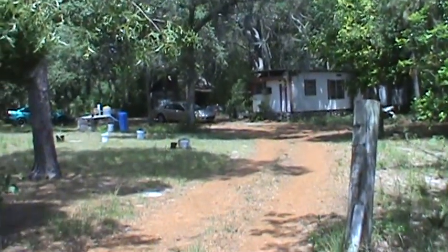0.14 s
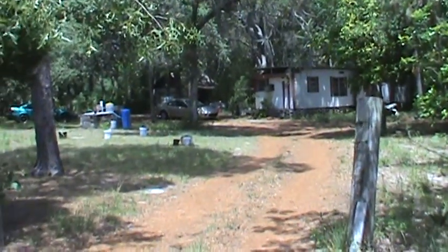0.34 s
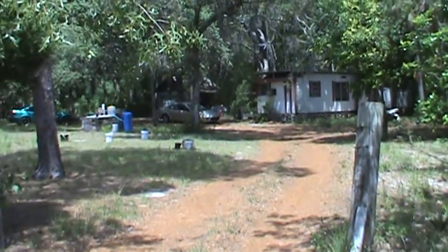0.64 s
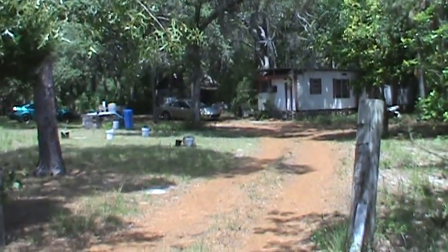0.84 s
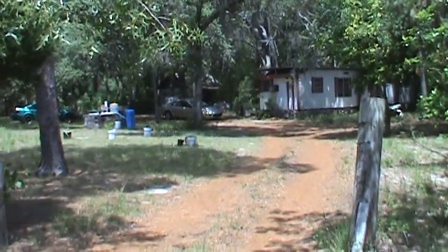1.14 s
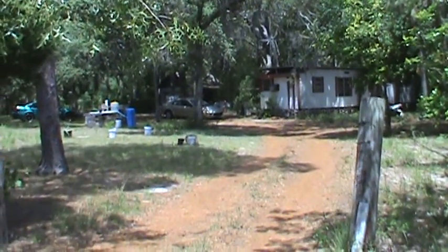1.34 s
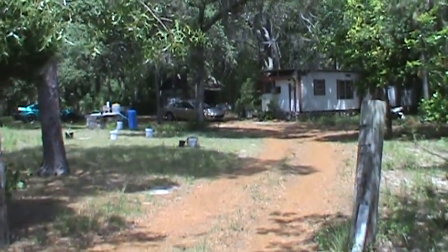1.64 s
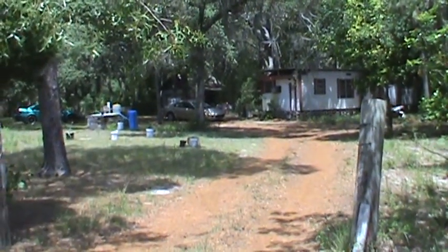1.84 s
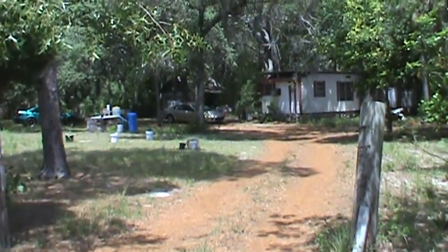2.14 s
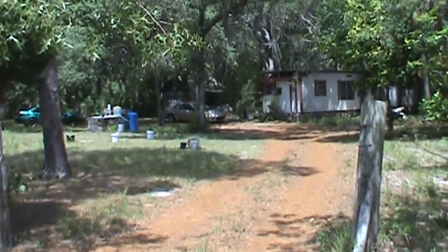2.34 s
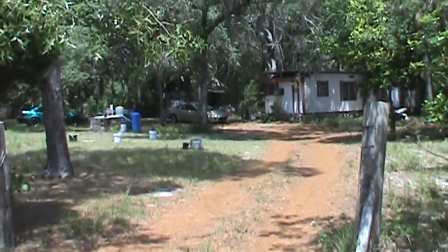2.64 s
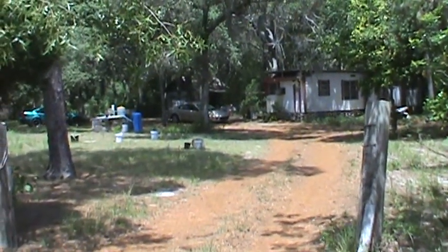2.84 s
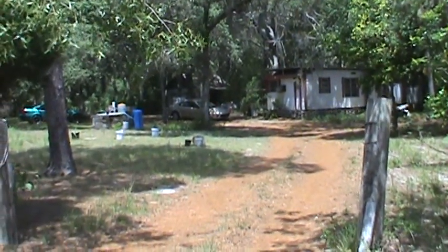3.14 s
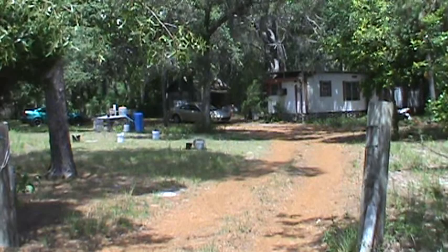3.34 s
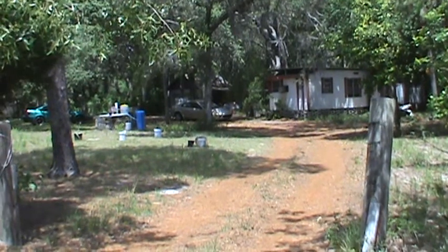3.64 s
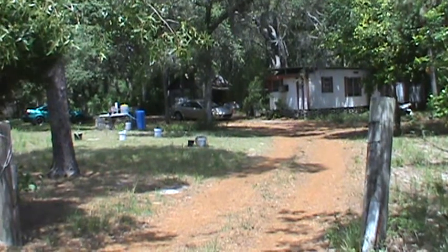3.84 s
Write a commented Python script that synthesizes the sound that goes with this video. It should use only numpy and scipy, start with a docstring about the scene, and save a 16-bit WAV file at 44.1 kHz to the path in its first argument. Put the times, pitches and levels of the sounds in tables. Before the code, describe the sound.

A motorcycle engine starts abruptly at about 2.3 seconds and revs hard, peaking near 2.5, 3.15 and 3.8, sinking into a ragged low burble between; bassy exhaust booms, barks and hisses, with a short scatter off trees and its low end rightward. Beforehand: quiet airy wash, steady cricket trill, faint distant motor climbing in pitch, a dry tick at 0.4 and soft microphone bump at 0.9.

```python
"""A motorcycle engine fires up beside a quiet country driveway, and its speed flares three times.
Each firing is a click that thumps through the exhaust pipe's resonances. With the throttle open,
bursts of noise add a rasp and a hiss, and the trees scatter the sound as a short noise tail.
Around it are a distant motor (wavering harmonics and chugging noise), a trilling cricket (a pulsed
tone), a wash of filtered noise, one dry tick and a soft bump on the microphone."""
import sys
import numpy as np
from scipy import signal
from scipy.fft import rfft, irfft
from scipy.io import wavfile
from scipy.ndimage import uniform_filter1d

SR = 44100
rng = np.random.default_rng(int(sys.argv[2]) if len(sys.argv) > 2 else 0)


def inscribe(sig):
    """Save sig as 16-bit PCM at rate SR to the path in sys.argv[1].

    A 1-D sig is mono; a 2-D sig holds one channel per row.
    Samples are clipped to [-1, 1] before scaling.
    """
    pcm = np.round(np.clip(np.atleast_2d(sig).T, -1, 1) * 32767)
    wavfile.write(sys.argv[1], SR, pcm.astype(np.int16))


N = 176400
T = np.arange(N) / SR  # time of each sample, in seconds
FREQS = np.maximum(np.arange(N + 1) * SR / (2 * N), 1)  # pitches that colour() filters, in Hz
START_S = 2.31  # ignition

# engine speed over time: time_s [s], speed_hz [firings per second]
ENGINE_SPEED = [(2.32, 39.4), (2.37, 51), (2.40, 66), (2.46, 108), (2.54, 144), (2.62, 115), (2.68, 105),
                (2.74, 104.7), (2.80, 83), (2.89, 67), (2.96, 56.7), (3.0, 54.2), (3.05, 51), (3.11, 92),
                (3.16, 105.3), (3.23, 94), (3.29, 71.7), (3.36, 62.5), (3.44, 59), (3.5, 57.3),
                (3.62, 60.8), (3.73, 60.6), (3.79, 103.5), (3.83, 120.7), (3.89, 112), (3.95, 101.4)]
# noise levels as the throttle moves, before each is trimmed: time_s [s], rasp_db [dB], hiss_db [dB]
THROTTLE_LEVELS = [(2.3, -53, -53), (2.38, -47.5, -40), (2.438, -22.5, -34), (2.548, -18.5, -26),
                   (2.61, -27.5, -37.5), (2.778, -31.5, -50.5), (2.912, -34.5, -49.5), (2.988, -37, -51),
                   (3.08, -36, -42), (3.15, -18.5, -32), (3.198, -23.5, -29.5), (3.242, -32.5, -33.5),
                   (3.304, -30.5, -48), (3.424, -35.5, -49), (3.722, -44.5, -44.5), (3.792, -22, -31),
                   (3.836, -19, -26), (3.904, -27.5, -28.5), (3.97, -30.5, -52), (4.0, -30, -52)]


def from_db(db):
    """Turn decibels into a gain."""
    return 10 ** (np.asarray(db) / 20)


def rms_one(x):
    """Scale a sound so that its average strength (rms) is 1."""
    return x / np.sqrt(np.mean(x ** 2) + 1e-20)


def in_time(rows):
    """Draw straight lines between the rows of a table: one curve per column, sample by sample."""
    time_s, *columns = np.transpose(rows)
    return [np.interp(T, time_s, column) for column in columns]


def colour(x, points, share=1):
    """Make some pitches louder and others softer, by a table of pitch_hz and level_db."""
    hz, db = np.transpose(points)
    gain_db = share * np.interp(np.log(FREQS), np.log(hz), db)
    return irfft(rfft(x, 2 * N) * from_db(gain_db))[..., :N]


def drift(rate):
    """Slow random motion with spread 1; a higher rate (Hz) wanders faster."""
    hz = np.arange(N // 2 + 1) * SR / N
    spectrum = rfft(rng.standard_normal(N))
    return rms_one(irfft(spectrum / (1 + (hz / rate) ** 2), N))


def evened(x, window_s):
    """Hold the running strength close to 1, so that a level curve can shape it afterwards."""
    size = max(int(window_s * SR), 3)
    power = uniform_filter1d(uniform_filter1d(x ** 2, size), size)
    floor = np.mean(x ** 2) / 1000  # keeps near-silence from being blown up
    return x / np.sqrt(np.abs(power) + floor)


def resonance(x, hz, width_hz):
    """Ring at one pitch like a struck pipe, with gain 1 at the peak; a narrow width rings longer."""
    r = np.exp(-np.pi * width_hz / SR)
    top = np.array([1, 0, -1]) * (1 - r * r) / 2
    bottom = [1, -2 * r * np.cos(2 * np.pi * hz / SR), r * r]
    return signal.lfilter(top, bottom, x + 1e-18)


def band(x, low_hz, high_hz):
    """Keep only the pitches between two limits, with steep edges."""
    return signal.sosfilt(signal.butter(5, [low_hz, high_hz], "band", fs=SR, output="sos"), x)


def far_motor():
    """A distant motor: wavering harmonics that slowly climb, over chugging noise that grows with speed."""
    # pitch and harmonics before they waver: time_s [s], pitch_hz [Hz],
    # second_db [dB], third_db [dB], fifth_db [dB] (multiples 2, 3 and 5 of the pitch)
    far_harmonics = [(0, 55.1, -49, -57, -81), (.22, 56.15, -43, -56, -88), (.69, 58.54, -42, -55, -59),
                     (.77, 61.76, -55, -51.5, -52), (1.1, 64.57, -47.5, -51, -50),
                     (1.5, 66.88, -48.5, -48.5, -54), (2.3, 70.56, -48, -48.5, -52)]
    # resonances of the motor's body: pitch_hz [Hz], width_hz [Hz], level_db [dB, relative]
    murmur_tones = [(309, 38, -4.5), (448, 70, 13), (610, 34, -0.5), (1510, 230, -22)]
    waver_db = 2
    murmur_db, murmur_db_per_hz = -51, 0.5  # level at top speed; loss per Hz below it
    hz, *levels = in_time(far_harmonics)
    phase = 2 * np.pi * np.cumsum(hz * (1 + 0.014 * drift(rate=15))) / SR
    # noise in pulses, every other one stronger
    chugs = np.exp(np.cos(phase) + .5 * np.cos(phase / 2)) * rng.standard_normal(N)
    murmur = rms_one(sum(from_db(db) * resonance(chugs, centre, width) for centre, width, db in murmur_tones))
    sound = murmur * from_db(murmur_db + murmur_db_per_hz * (hz - hz.max()))
    for multiple, db in zip((2, 3, 5), levels):
        gain = np.sqrt(2) * from_db(db + waver_db * drift(rate=25))
        sound = sound + gain * np.sin(multiple * phase)
    return sound


def cricket():
    """A steady trill: one tone that swells and slides down with each wing stroke."""
    pitch_hz, sweep_hz, strokes_per_s = 3391, 22, 57.5  # the pitch moves 22 Hz to either side
    level_db, flutter_db = -61.5, 0.9
    wing = 2 * np.pi * strokes_per_s * T
    strokes = 1 + np.cos(wing)
    phase = 2 * np.pi * np.cumsum(pitch_hz - sweep_hz * np.sin(wing)) / SR
    return from_db(level_db + flutter_db * drift(rate=37)) * strokes * np.sin(phase)


def air():
    """Soft wash of far traffic and leaves: coloured noise, slightly different in each channel."""
    # tone of the outdoor background: pitch_hz [Hz], level_db [dB per Hz, relative]
    air_colour = [(20, -66), (45, 3.5), (100, 0), (160, -4), (330, -0.5), (620, -5.5), (1170, -14),
                  (1700, -17), (2800, -23), (4200, -26), (7000, -31.5), (15500, -32.5)]
    # loudness of its shared part: time_s [s], level_db [dB]
    air_level = [(0, -44), (1.2, -42)]
    width_db = -9  # part that differs between left and right, against the shared part
    mid, side = colour(rng.standard_normal((2, N)), air_colour)
    opposed = rms_one(side) * np.array([[1], [-1]])
    return from_db(in_time(air_level)[0]) * (rms_one(mid) + from_db(width_db) * opposed)


def tick():
    """One faint dry tick in the yard: a very short tone with a broad edge of noise."""
    start_s, pitch_hz, length_s, level_db = .404, 3100, .003, -51.5  # start_s is its middle
    crack_db = -7  # noise edge, against the tone
    t = T - start_s
    noise = band(rng.standard_normal(N), pitch_hz / 2, pitch_hz * 2)
    edge = from_db(crack_db) * rms_one(noise)
    return from_db(level_db) * np.exp(-(t / length_s) ** 2) * (np.sin(2 * np.pi * pitch_hz * t) + edge)


def bump():
    """A dull knock on the microphone: a low tone that swells and dies within a moment."""
    middle_s, pitch_hz, width_s, level_db = .895, 77, 0.0094, -26.5
    t = T - middle_s
    return from_db(level_db) * np.exp(-(t / width_s) ** 2) * np.cos(2 * np.pi * pitch_hz * t)


def swing(sign):
    """0-1: how hard the engine speed climbs (sign above 0) or falls (sign below 0)."""
    full_hz_per_s = 160  # change of speed that counts as full when sign is 1
    speed, = in_time(ENGINE_SPEED)
    change = np.gradient(speed) * SR
    return uniform_filter1d(np.clip(sign * change / full_hz_per_s, 0, 1), size=1500)


def overrun():
    """0 while the engine pulls, up to 1 while it coasts down with the throttle shut."""
    return swing(-1.3)


def firings():
    """One click per firing: fairly even under load, ragged as the engine burbles on the overrun."""
    # strength of successive firings, taken in turn: level_db [dB]
    cylinder_db = [1.5, -1.5, .8, -.8]
    first_firing = .6  # share of the first cycle already turned
    cylinder_late = .015  # alternate firings come early and late: share of a cycle
    timing_scatter, overrun_timing = .012, .03  # share of a cycle: under load; added on the overrun
    scatter_db, overrun_scatter_db = 1.2, 2.4  # spread of strength: under load; added on the overrun
    speed, = in_time(ENGINE_SPEED)
    cycles = first_firing + np.cumsum(speed * (T > START_S)) / SR
    k = np.arange(1, int(cycles[-1]))  # number of each firing
    chance = rng.standard_normal((400, 2))[k]
    ragged = overrun()[np.searchsorted(cycles, k)]
    shift = cylinder_late * (-1) ** k + (timing_scatter + overrun_timing * ragged) * chance[:, 0]
    at = np.minimum(np.searchsorted(cycles, k + shift), N - 1)
    strength_db = np.array(cylinder_db)[k % len(cylinder_db)]
    strength_db = strength_db + (scatter_db + overrun_scatter_db * ragged) * chance[:, 1]
    clicks = np.zeros(N)
    clicks[at] = from_db(strength_db)
    return clicks


def puffs(clicks, decay_s, steady):
    """Turbulent gas: a fading burst of noise at each firing over a steady flow."""
    gate = signal.lfilter([1], [1, -np.exp(-1 / (decay_s * SR))], clicks + 1e-18)
    return rms_one((gate + steady) * rng.standard_normal(N))


def hiss(clicks):
    """The exhaust jet spits and hisses: puffs of noise, with a bright spray at full throttle."""
    # tone of the jet: pitch_hz [Hz], level_db [dB per Hz, relative]
    hiss_colour = [(1500, 4.5), (3500, -2.5), (4500, -2.5), (6500, -1.5), (8000, -3.5), (10500, -3),
                   (12000, -8), (13500, -24), (15800, -22)]
    trim_db, flutter_db = 0.57, 1.0
    # top of the hiss: lower edge; level against the hiss at its loudest; dB gained per dB of hiss
    spray_hz, spray_db, spray_growth = 12100, -22.5, 1.3
    db = in_time(THROTTLE_LEVELS)[1] + trim_db
    jet = puffs(clicks, decay_s=.004, steady=.6) * from_db(flutter_db * drift(rate=4300))
    jet = evened(colour(jet, hiss_colour), window_s=0.26)
    top = signal.sosfilt(signal.butter(10, spray_hz, "high", fs=SR, output="sos"), jet)
    spray = evened(top, window_s=.035)
    return jet * from_db(db) + spray * from_db(db.max() + spray_db + spray_growth * (db - db.max()))


def rasp(clicks):
    """Each firing's sharp edge and puff of gas bark through higher pipe resonances; duller when quiet."""
    # higher resonances of the pipe: pitch_hz [Hz], width_hz [Hz], level_db [dB]
    pipe_ring = [(660.3, 14, 0.5), (700, 15, -9), (764, 26, -12), (1060, 22, -1.5), (1405, 11, -1),
                 (1673, 83, 6.5), (1760, 9.2, 1)]
    # tone of the bark: pitch_hz [Hz], level_db [dB per Hz, relative]
    rasp_colour = [(200, -36), (380, 7), (500, 5.5), (570, -0.5), (660, 1), (820, 5), (1060, 0.5),
                   (1300, -3), (1680, -9), (2500, -8), (3400, -13.5), (5000, -26), (9000, -51)]
    trim_db, crack_db = -1.5, -2.5  # overall trim; sharp edge against the gas puff
    # dull part that stays when the throttle shuts; growth is dB gained per dB that the rasp falls
    burble_hz, burble_width_hz, burble_db, burble_growth = 585, 116, -7, 1
    bite_hz, bite_lag_s = 1410, 0.014  # above this pitch the rasp swells later, by this much
    level_db = in_time(THROTTLE_LEVELS)[0] + trim_db
    drive = from_db(crack_db) * rms_one(clicks) + puffs(clicks, decay_s=.004, steady=.35)
    drive = drive + sum(from_db(db) * resonance(drive, hz, width) for hz, width, db in pipe_ring)
    bark = colour(drive, rasp_colour)
    burble_gain = from_db(burble_db + burble_growth * (level_db.max() - level_db))
    burble = resonance(bark, burble_hz, burble_width_hz) * burble_gain
    voice = evened(bark + burble, window_s=0.028)
    body = signal.sosfiltfilt(signal.butter(2, bite_hz, fs=SR, output="sos"), voice)
    bite = voice - body
    early = from_db(np.interp(T + bite_lag_s / 2, T, level_db))
    late = from_db(np.interp(T - bite_lag_s / 2, T, level_db))
    return body * early + bite * late


def boom(clicks):
    """Firings ring the pipe's low notes; under pull they blow through as clean gliding harmonics."""
    # low resonances of the pipe before they wander: pitch_hz [Hz], width_hz [Hz], level_db [dB]
    pipe_tones = [(65.41, 21, 7), (91, 16.3, -4), (122, 16, -6), (175.2, 17, 0.5), (211.8, 17.3, 8),
                  (242.6, 10, -11), (302.2, 14.6, 4), (338.8, 15.3, 1.5)]
    # level of the deep thump, before its trim: time_s [s], level_db [dB]
    thump_level = [(2.3, -50), (2.318, -31), (2.404, -21), (2.546, -23.5), (2.578, -18), (2.674, -30),
                   (3.056, -30), (3.118, -21.5), (3.312, -32.5), (3.512, -25), (3.564, -36), (3.662, -26.5),
                   (3.7, -40), (3.762, -19), (3.88, -23.5), (4.0, -27.5)]
    # level of the boom above it: time_s [s], level_db [dB]
    boom_level = [(2.3, -57), (2.314, -50), (2.374, -23), (2.45, -15.5), (2.636, -25), (2.688, -13.5),
                  (2.734, -21), (2.772, -26), (3.056, -22.5), (3.1, -13), (3.204, -27.5), (3.308, -20),
                  (3.412, -27.5), (3.526, -23.5), (3.55, -29), (3.686, -27), (3.758, -16.5), (3.894, -19),
                  (3.918, -34), (3.952, -20), (4.0, -26)]
    # speeds between which the thump merges into a clean drone: speed_hz [firings per second]
    racing_hz = [77.4, 124]
    thump_trim_db, boom_trim_db = 1, 0
    turbulence_db, overrun_turbulence_db = -13, 2  # gas noise against the clicks; added on the overrun
    wander_db = 4  # each resonance waxes and wanes on its own
    low_hz, split_hz, pull_top_hz, top_hz = 58, 155.6, 252, 345.4
    pull_direct = .85  # share that blows straight through at full pull
    gas_gain = from_db(turbulence_db + overrun_turbulence_db * overrun())
    drive = rms_one(clicks) + gas_gain * puffs(clicks, decay_s=0.063, steady=0.19)
    rings = np.array([from_db(db + wander_db * drift(rate=14)) * resonance(-drive, hz, width)
                      for hz, width, db in pipe_tones])
    deep = np.array(pipe_tones)[:, 0] < split_hz
    speed, = in_time(ENGINE_SPEED)
    pull = swing(1) * (speed > pipe_tones[0][0])
    racing = np.maximum(pull, np.interp(speed, racing_hz, [0, 1]))
    thump_db = in_time(thump_level)[0] + thump_trim_db
    boom_db = in_time(boom_level)[0] + boom_trim_db
    out = 0
    for part, drone, bottom_hz, ceiling_hz, level_db in (
            (deep, racing, low_hz, split_hz, thump_db),
            (~deep, pull, split_hz, pull_top_hz, boom_db)):
        direct = pull_direct * drone
        ringing = rms_one(band(rings[part].sum(axis=0), low_hz, top_hz))
        passage = signal.butter(3, [bottom_hz, ceiling_hz], "band", fs=SR, output="sos")
        through = rms_one(signal.sosfilt(passage, -clicks))
        mix = (1 - direct) * ringing + direct * through
        out = out + evened(mix, window_s=0.015) * from_db(level_db)
    rumble_cut = signal.butter(2, low_hz * 0.65, "high", fs=SR, output="sos")
    return signal.sosfilt(rumble_cut, out * (T > START_S))


def among_trees(x):
    """Trees return a short fading blur of the direct sound; the engine's low end lies to the right."""
    # scattered sound: pitch_hz [Hz], level_db [dB against the direct sound]
    scatter_colour = [(250, -6.5), (800, -1.5), (3000, 3), (12000, -5)]
    # left minus right: pitch_hz [Hz], level_db [dB]
    engine_pan = [(60, -12), (130, -6), (250, -4.5), (500, -1.6), (1000, 0), (2000, 0.5), (4500, 2),
                  (8000, 2), (14000, -1.5)]
    t60_s, width = 0.52, 0.44  # time to fade by 60 dB; part of the tail that differs between channels
    fade = from_db(-60 * T / t60_s) * (T > .004)  # the tail starts after 4 ms
    mid, side = rng.standard_normal((2, N)) * fade
    tail = mid + width * side * np.array([[1], [-1]])
    tail /= np.sqrt(np.sum(tail ** 2, axis=1, keepdims=True))
    scattered = signal.fftconvolve(x[None], tail, axes=1)[:, :N]
    left, right = x + colour(scattered, scatter_colour)
    return np.array([colour(left, engine_pan, .5), colour(right, engine_pan, -.5)])


def motorcycle():
    """Boom, rasp and hiss, all driven by the same firings and then scattered by the trees."""
    lead_s = 0.12  # the gas noise swells in over this time before ignition
    clicks = firings()
    swell = np.clip(1 + (T - START_S) / lead_s, 0, 1)
    return among_trees(boom(clicks) + (rasp(clicks) + hiss(clicks)) * swell)


def scene():
    """The motorcycle over the quiet of the yard."""
    return motorcycle() + air() + far_motor() + cricket() + bump() + tick()


def record(dry):
    """Cut the treble steeply above 15850 Hz."""
    return signal.sosfilt(signal.ellip(12, .1, 90, 15850, fs=SR, output="sos"), dry)


dry = scene()
out = record(dry)
inscribe(out)
```